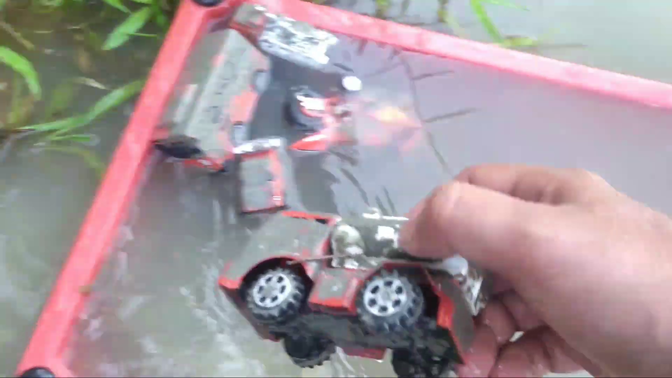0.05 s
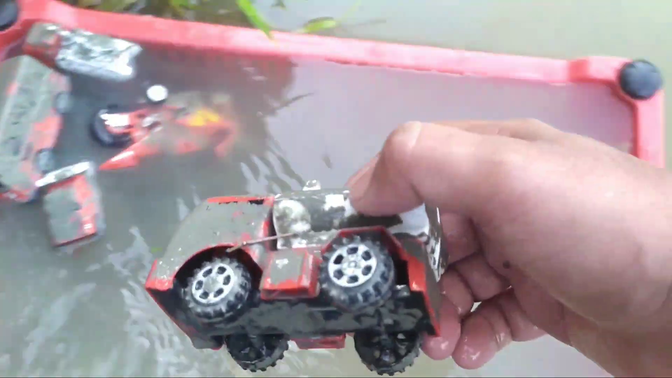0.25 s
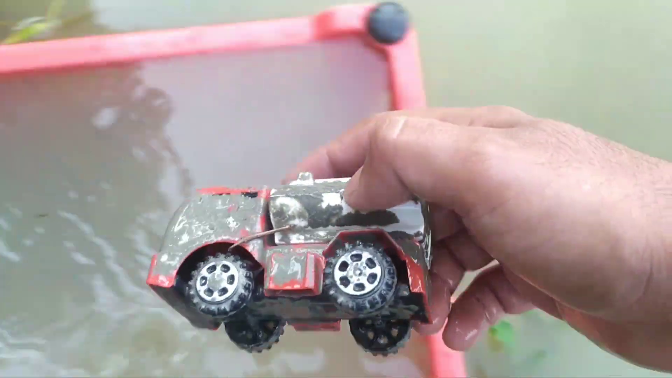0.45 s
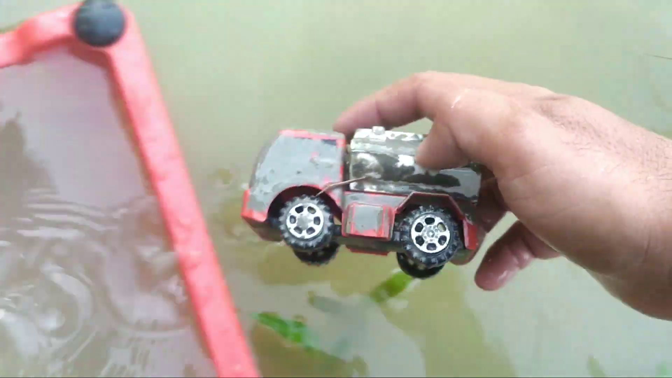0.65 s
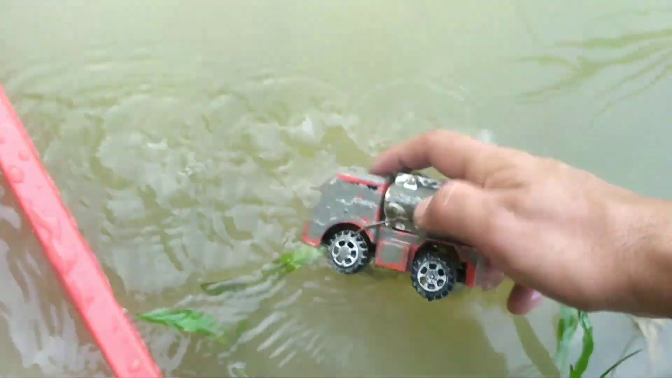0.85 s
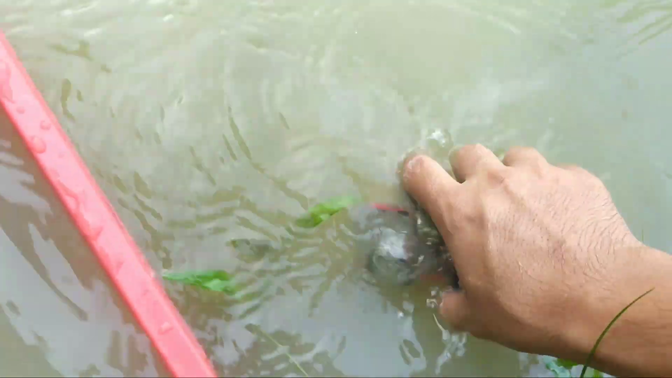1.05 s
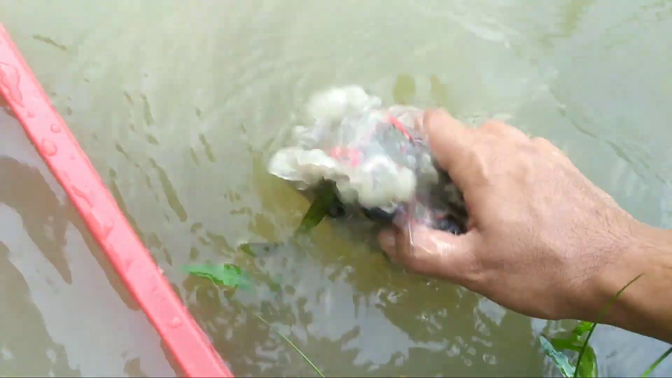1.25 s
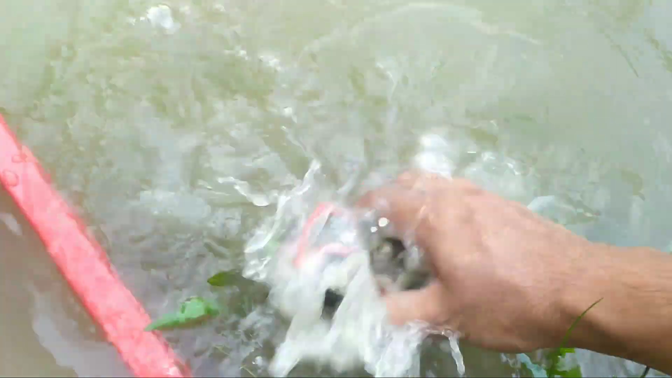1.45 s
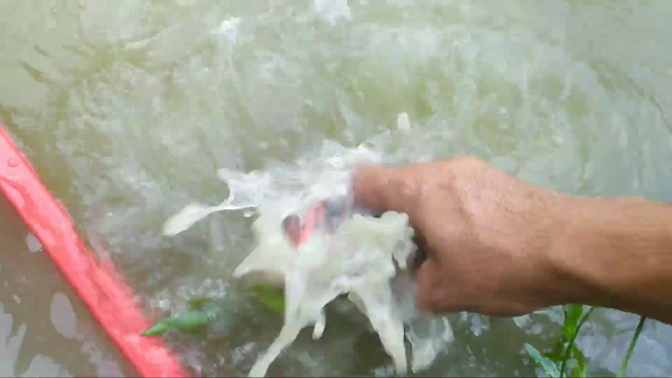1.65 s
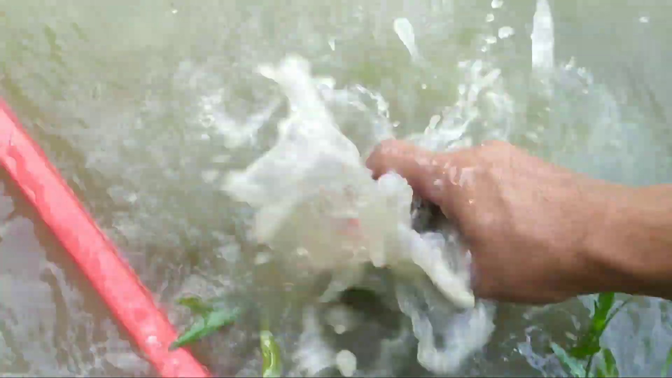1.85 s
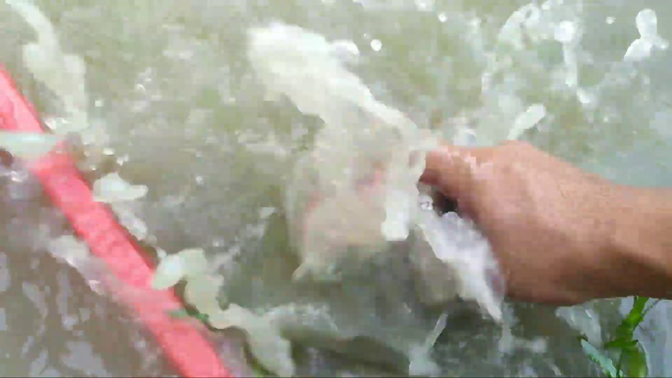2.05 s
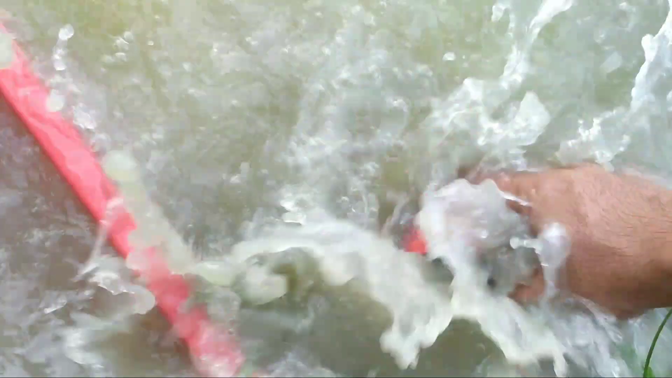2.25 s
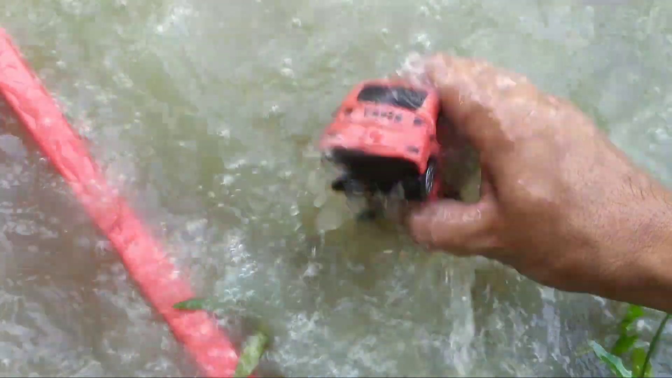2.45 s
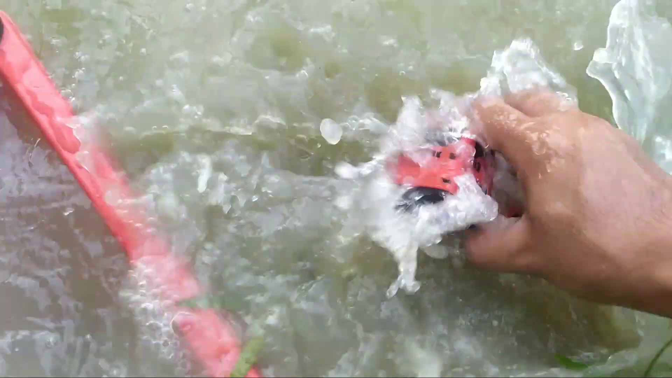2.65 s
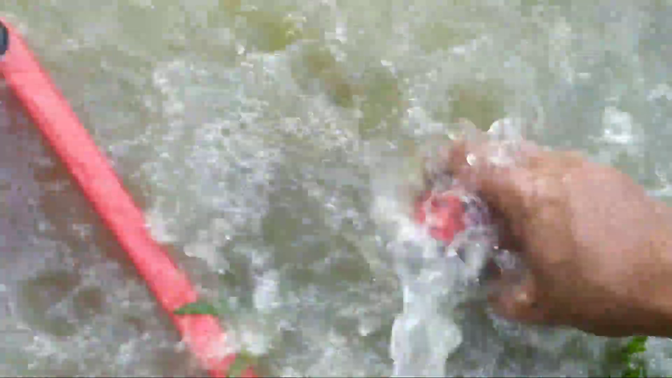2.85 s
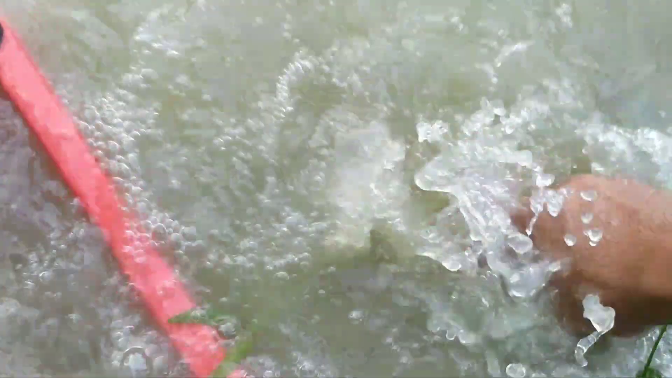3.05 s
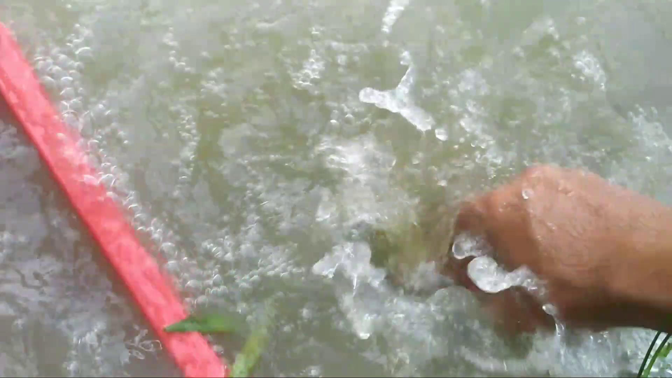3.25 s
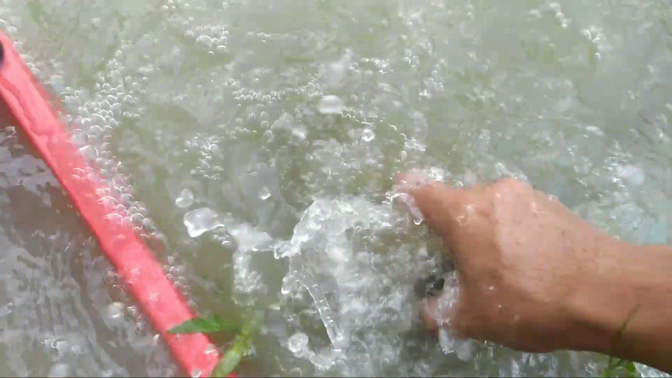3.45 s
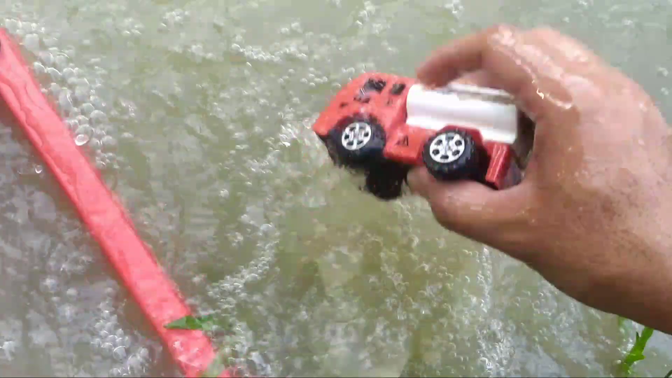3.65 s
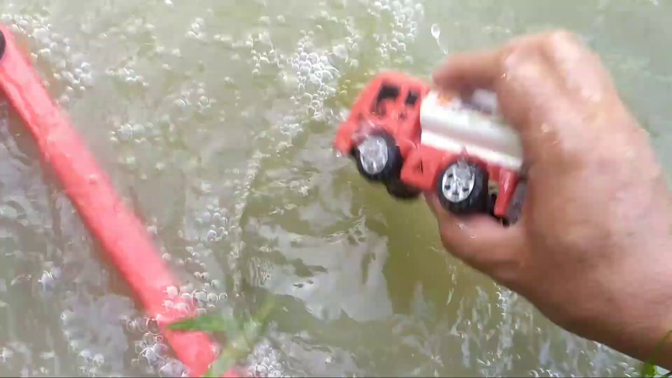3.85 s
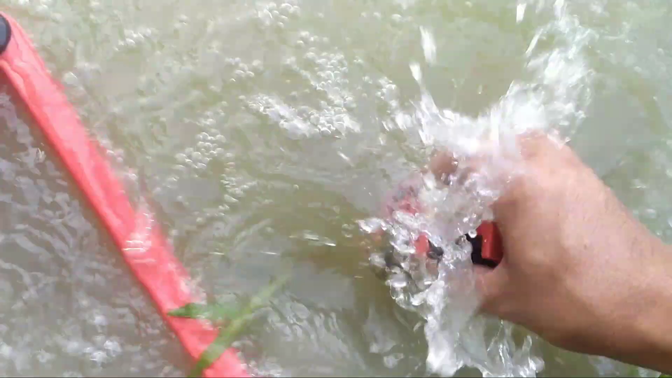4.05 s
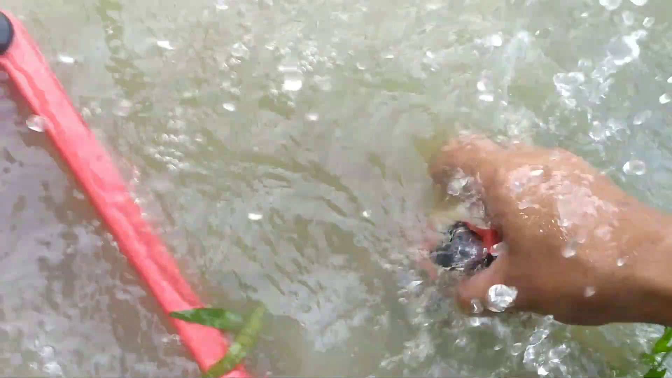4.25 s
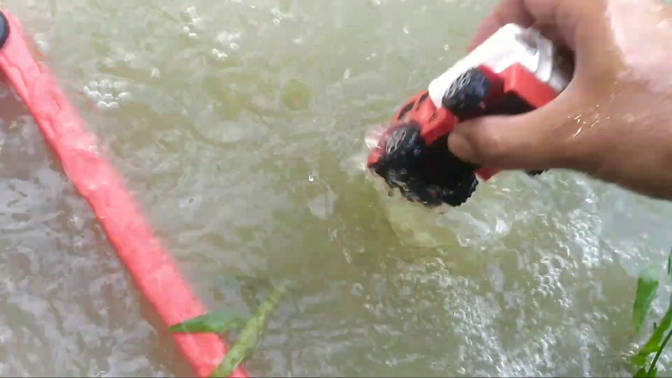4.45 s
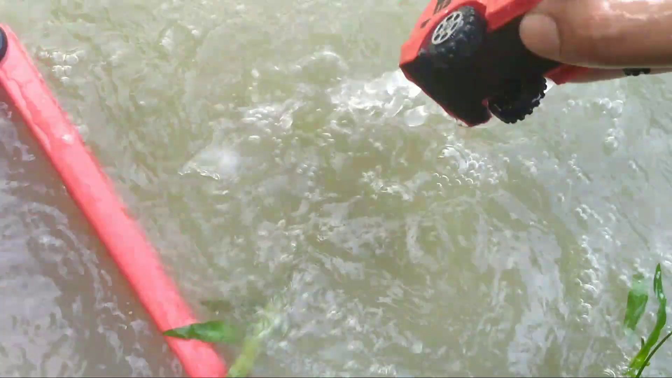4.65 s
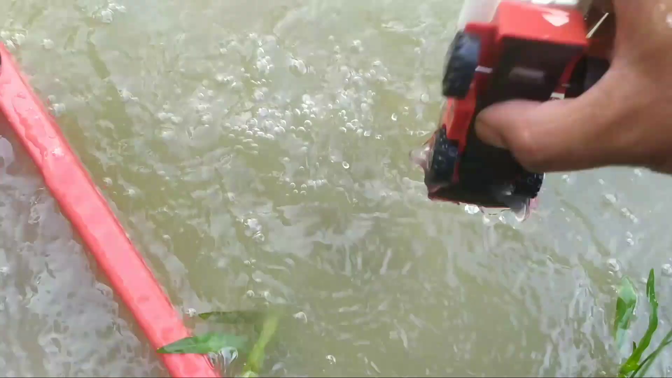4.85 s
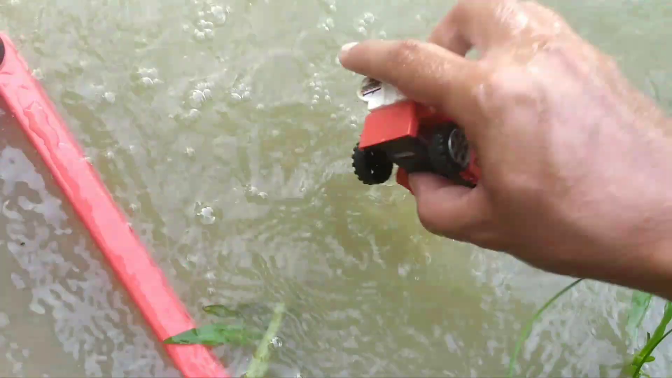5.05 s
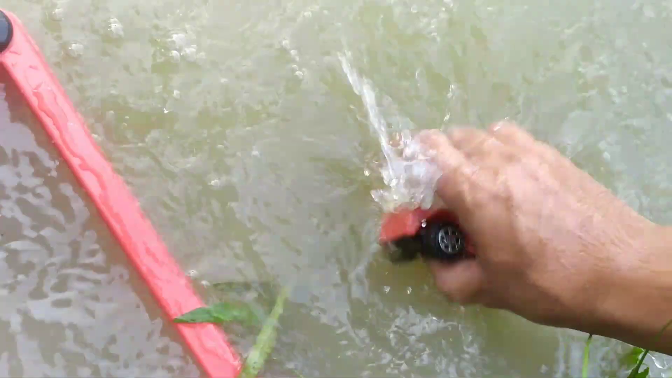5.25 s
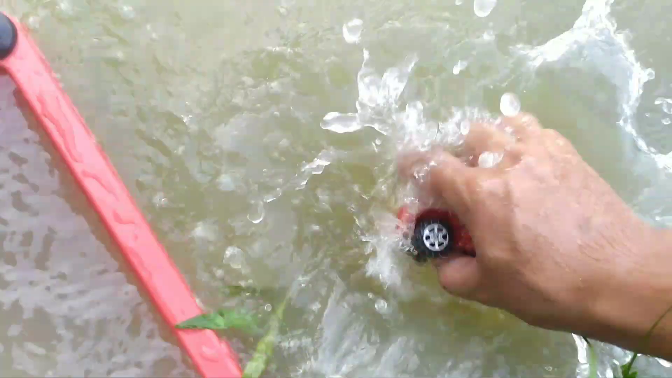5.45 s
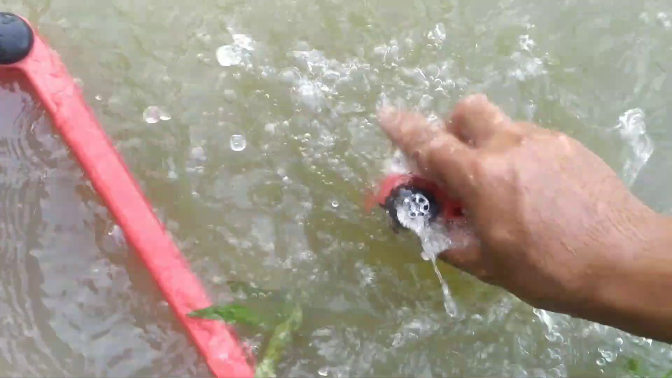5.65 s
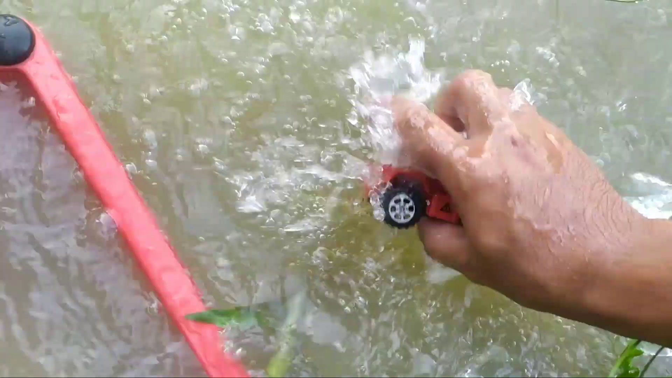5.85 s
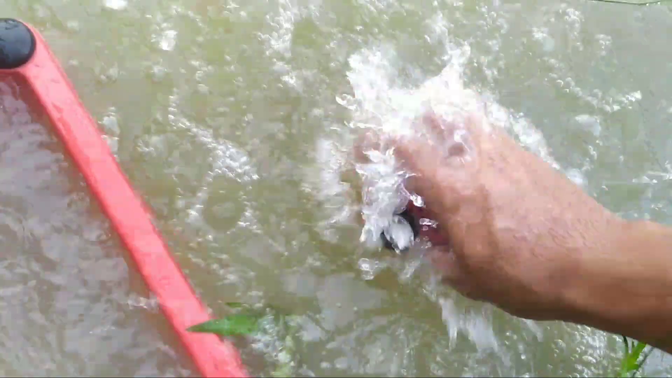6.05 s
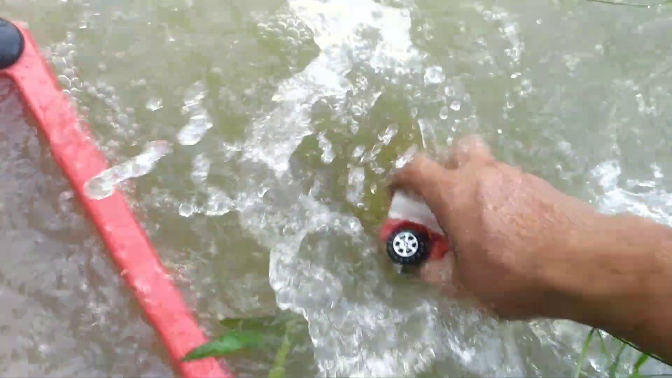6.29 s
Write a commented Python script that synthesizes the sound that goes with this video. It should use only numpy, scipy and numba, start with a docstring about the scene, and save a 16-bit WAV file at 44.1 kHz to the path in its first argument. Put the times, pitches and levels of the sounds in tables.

```python
"""Surges of bubbles and spray as a small plastic toy is shaken to and fro in a puddle, close to a phone.
Each stroke drives crowds of short rising rings with hiss; slaps are a hard knock, a cluster of short
rings and a treble crack. Single bubbles and drops plink as damped sines that stand out from the crowds.
A far motor hums unevenly as narrow noise bands, with low rumble, under a faint outdoor hiss."""
import sys
import numpy as np
from scipy import signal
from scipy.fft import rfft, irfft, next_fast_len
from scipy.io import wavfile
from scipy.ndimage import uniform_filter1d
from numba import njit

SR = 44100
rng = np.random.default_rng(int(sys.argv[2]) if len(sys.argv) > 2 else 0)


def int16_out(signal):
    """Quantize to a 16-bit WAV file."""
    q = np.round(np.clip(np.atleast_2d(signal).T, -1, 1) * 32767)
    wavfile.write(sys.argv[1], SR, q.astype(np.int16))


N = 278800

FULL_BOIL_DB = -38.5  # stirring level under which bubbles grow rarer

# How much big trapped air gurgles. Each row: time in seconds, gurgle over fizz in dB.
GULP = [(0, -4), (1.4, -6.5), (1.8, 0), (2.0, -16), (2.33, -17.5), (2.45, 3), (3.0, 0), (3.5, 4),
        (3.95, -16), (4.3, 10.5), (5.2, -26), (5.35, -2.5), (5.7, -4), (6.32, -4)]


def undb(db):
    """Gain of a level in dB."""
    return 10 ** (np.asarray(db) / 20)


def level(x, db):
    """Scale to an rms level in dB."""
    return x * undb(db) / np.sqrt(np.mean(x ** 2))


def noise():
    """White noise as long as the scene."""
    return rng.standard_normal(N)


def colour(x, points):
    """Filter by (Hz, dB) points joined on a log-frequency axis."""
    size = next_fast_len(len(x))
    hz, db = np.transpose(points)
    bins = np.arange(1, size // 2 + 2) * SR / size
    gain = undb(np.interp(np.log(bins), np.log(hz), db))
    return irfft(rfft(x, size) * gain, size)[:len(x)]


def curve(points):
    """A control of (seconds, value) points joined by straight lines, sample by sample."""
    return np.interp(np.arange(N) / SR, *np.transpose(points))


def clumps(rate, db):
    """Random gains, `rate` a second, joined by ramps in dB: water tears in lumps."""
    hold = int(SR / rate)
    steps = np.repeat(rng.standard_normal(N // hold + 1), hold)
    return undb(db * uniform_filter1d(steps, hold)[:N])


@njit
def rings(start, hz, t60, climb, size, onset):
    """Damped sines that swell over `onset` cycles while their pitch climbs (Hz a second), as bubbles do."""
    out = np.zeros(N)
    for k in range(len(start)):
        n = t60[k] * SR
        # the phasor z turns and shrinks by step; glide speeds up the turning
        z, glide = size[k] + 0j, np.exp(2j * np.pi * climb[k] / SR / SR)
        step = np.exp(2j * np.pi * hz[k] / SR - np.log(1000) / n)
        wait, swell = 1., np.exp(-hz[k] / (onset * SR))
        first = int(start[k] * SR)
        for i in range(first, min(first + int(n), N)):
            out[i] += z.imag * (1 - wait)
            z, step, wait = z * step, step * glide, wait * swell
    return out


def air():
    """The outdoor hiss: steady coloured noise."""
    # Each row: frequency in Hz, density in dB per Hz.
    air_colour = [(150, 2), (300, 4.5), (500, 1.5), (1000, -26), (3400, -9.5), (6800, -12.5), (9000, -11)]
    return level(colour(noise(), air_colour), -57.5)


def rumble():
    """Low noise that swells and sinks."""
    # Each row: time in seconds, level in dB.
    rumble_swell = [(0, -40.5), (.17, -34), (.32, -44), (2.2, -44.5), (2.9, -44), (3.9, -45), (4.2, -46.5),
                    (4.5, -39), (4.8, -44.5), (6.32, -44.5)]
    # Each row: frequency in Hz, density in dB per Hz.
    rumble_colour = [(20, -67.5), (32, -28), (45, 0), (67, 3), (95, -5), (125, -5.5), (180, -10.5),
                     (260, -24.5), (500, -68)]
    return level(colour(noise(), rumble_colour), 0) * undb(curve(rumble_swell))


def motor():
    """The far motor: noise through narrow resonances makes tones that waver."""
    # Each row: pitch in Hz, width in Hz, level over the motor curve in dB.
    tones = [(68.1, 2.7, 0), (109, 8.1, -18.5)]
    # Each row: time in seconds, level of the hum in dB.
    motor_swell = [(0, -42), (.7, -45), (1.3, -39), (1.7, -48), (2.5, -39.5), (3.8, -42), (4.05, -42.5),
                   (4.5, -45), (5.3, -47.5), (6.32, -45.5)]
    hum = np.zeros(N)
    for hz, width, db in tones:
        b, a = signal.iirpeak(hz, hz / width, SR)
        hum += level(signal.lfilter(b, a, noise()), db)
    return hum * undb(curve(motor_swell))


def burst(s, db, hz, t60, spread, count):
    """Each impact sheds a tight cluster of very short rings, scattered in pitch (octaves) and start."""
    late, detune, longer = np.moveaxis(rng.random((len(s), count, 3)), -1, 0)
    start = s[:, None] + .11 * t60 * late
    pitch = np.clip(hz[:, None] * 2 ** (spread * (detune - .5)), 100, 8600)
    size = undb(db[:, None] - 10 - 2.4 * late)
    ring = (t60 * (.78 + .5 * longer)).ravel()
    return rings(start.ravel(), pitch.ravel(), ring, 0 * ring, size.ravel(), .6)


def ticks():
    """Drops bursting on the surface, bright and dry: a sharp tap and a cluster of short rings."""
    # Each row: time in seconds, level in dB, centre in Hz.
    drops = [(.1116, -47.5, 6400), (0.201, -39.5, 6770), (.227, -35, 7000), (.292, -46, 3900),
             (0.3002, -31.5, 6130), (0.3056, -36, 6700), (.3625, -35, 7100), (0.389, -43, 7000),
             (0.441, -31.5, 6330), (0.483, -34.5, 4900), (.4946, -38.5, 6400), (0.694, -46.5, 7300),
             (0.927, -29.5, 4050), (.95, -34.5, 4700), (1.043, -42, 5270), (1.1, -39, 3350),
             (1.3166, -43, 6000), (1.6537, -26.5, 3520), (1.7544, -23, 6450), (2.138, -27, 3950),
             (3.619, -28.5, 6660), (4.337, -28, 5340), (4.3776, -32.5, 5550), (5.167, -45, 4350),
             (5.1864, -26.5, 3720), (5.244, -26.5, 7800), (6.1528, -20.5, 3420)]
    s, db, hz = np.transpose(drops)
    t60 = .025  # s, basis for the cluster's rings
    tap = rings(s, hz, .28 * t60 + 0 * s, 0 * s, undb(db + 4), .13)
    return tap + burst(s, db, hz, t60, .91, count=12)


def slaps():
    """The toy or a sheet of water slaps the surface: one hard knock, a broken body and a treble crack."""
    # Each row: time in seconds, level in dB, centre in Hz, treble over that level in dB.
    hits = [(1.485, -20, 2060, -21), (1.684, -17.5, 1380, -7), (1.87, -14.5, 2900, -23),
            (2.8, -10, 1900, -1), (3.025, -6.5, 282, -17), (3.206, -13.5, 1415, -14),
            (3.386, -12.5, 1350, -36), (3.995, -8, 640, -21), (4.093, -7.5, 1236, -35),
            (4.116, -16.5, 2210, 5), (4.509, -34.5, 1400, 4), (5.001, -31, 1320, -8),
            (5.565, -13.5, 1740, -7.5), (5.643, -13.5, 2450, 0.5), (5.822, -21, 1210, -7),
            (6.262, -11.5, 2350, -4)]
    s, db, hz, treble_db = np.transpose(hits)
    t60 = .016  # s, basis for all three parts
    knock = rings(s, hz, .4 * t60 + 0 * s, 0 * s, undb(db + 1), .25)
    body = burst(s, db - 5, hz, t60, 1, count=5)
    crack = burst(s, db + treble_db, 4500 + 0 * s, .67 * t60, 1.3, count=12)
    return knock + body + crack


def drips():
    """The clearest bubbles: the tap of the drop that trapped each, its ring, and a smaller twin that roughens it."""
    # Each row: start in seconds, size in dB, first pitch in Hz, ring t60 in ms, pitch climb in Hz per ms.
    plinks = [(0.046, -42, 2890, 25, -2), (.089, -39.5, 1920, 32, 4), (.134, -34, 3260, 16, 0),
              (.148, -52, 1860, 30, -3), (.16, -36.5, 3080, 29, 6), (.232, -48, 2850, 20, -4),
              (.26, -39, 1639, 37, 29), (.262, -45.5, 2750, 57, 0), (.307, -43, 1180, 49, -4.5),
              (.39, -37, 1116, 62, 33), (0.444, -46.5, 1115, 75, -1), (0.898, -44, 1470, 16, 5),
              (0.912, -27.5, 1330, 9.1, 15), (.972, -37, 1800, 27, 11), (.977, -28.5, 940, 25, 15),
              (1.005, -39, 645, 43, 1.5), (1.019, -41, 3150, 31, -1), (1.038, -39.5, 1110, 17, 2),
              (1.04, -44, 5100, 35, 6), (1.076, -34.5, 890, 9.4, 0), (1.11, -21, 394, 14, 30),
              (1.133, -37.5, 1570, 15, 21), (1.178, -32, 530, 55, 10.5), (1.192, -44.5, 865, 93, 26.5),
              (1.205, -57, 780, 710, -1), (1.321, -34.5, 850, 37, 13), (1.323, -38, 1264, 40, 19),
              (1.363, -32, 1140, 32, 5), (1.376, -28.5, 1895, 32, 9), (1.424, -12, 1225, 11, -11),
              (1.441, -14.5, 900, 12, 3), (1.68, -29.5, 1205, 80, 1.5), (1.837, -26.5, 560, 71, 11),
              (1.987, -26, 2010, 16, 44), (2.067, -18.5, 830, 18, -6), (2.161, -27, 2060, 28, 22),
              (2.229, -20, 2000, 11.4, 0), (2.301, -24.5, 2190, 19, 25), (2.336, -19, 1660, 14.5, 18),
              (2.388, -22, 334, 31, 1), (2.409, -31, 425, 100, 2.5), (2.41, -28.5, 2160, 38, 28),
              (2.59, -22, 600, 30, -1), (2.608, -19.5, 334, 49, 3), (2.68, -21, 794, 29, 3),
              (2.695, -22, 1690, 20, 16), (2.755, -20.5, 330, 58, 1.5), (2.771, -18, 727, 30, -1),
              (2.855, -18, 336, 30, -1.5), (2.885, -17, 327, 30, 0), (2.949, -20.5, 404, 25, 2),
              (3.192, -19, 730, 20, 7), (3.203, -14.5, 333, 37, 0.5), (3.205, -18.5, 1424, 57, 26),
              (3.368, -12, 405, 28, 4.5), (3.388, -16.5, 1155, 41, 29.5), (3.48, -26, 500, 27, -2),
              (3.527, -25, 690, 25, 3), (3.573, -30, 1875, 30, 10), (3.666, -37, 950, 24, 12),
              (3.683, -33.5, 1380, 32, 16), (3.721, -34, 620, 19, 0), (3.811, -38, 2160, 12, -6),
              (3.817, -43, 736, 54, 4), (3.836, -35.5, 1380, 34, 11), (3.838, -41, 676, 67, 2.5),
              (3.934, -39.5, 2210, 16, 34), (3.969, -19, 910, 14, 24), (3.969, -25.5, 1610, 22, 14),
              (4.123, -24.5, 527, 67, 8.5), (4.2, -24.5, 2240, 23, 10), (4.28, -32.5, 1755, 51, 17),
              (4.284, -25.5, 487, 54, 8.5), (4.404, -27, 3430, 13, -3), (4.418, -36, 1710, 29, 50),
              (4.436, -25, 1700, 18, 7), (4.453, -31, 447, 26, -2), (4.461, -32, 1810, 22, 22),
              (4.53, -51, 1410, 30, 11), (4.571, -38.5, 1270, 27, 31), (4.615, -44, 980, 44, 18),
              (4.697, -37, 970, 24, 2), (4.697, -39, 1525, 64, 6), (4.846, -42.5, 944, 55, 0),
              (4.887, -40, 1220, 37, 1), (4.956, -36, 3170, 7.6, 2), (4.983, -42, 2140, 18, 27),
              (5.003, -57, 820, 88, -3), (5.063, -33.5, 1123, 45, 48), (5.079, -38.5, 960, 66, 26),
              (5.118, -36, 1700, 17, 5), (5.135, -29.5, 1063, 40, -5.5), (5.188, -32.5, 1240, 53, 14),
              (5.258, -23.5, 794, 75, 9.5), (5.298, -25.5, 1787, 17, 26), (5.341, -22, 850, 33, -1),
              (5.442, -17.5, 695, 23, 21), (5.476, -21.5, 1250, 20, 0), (5.51, -18.5, 514, 32, 15),
              (5.663, -23, 2230, 24, 55), (5.793, -21, 1870, 14, 20), (5.908, -22.5, 416, 49, 9),
              (5.987, -18.5, 436, 40, 1), (5.987, -23, 727, 34, 4), (6.088, -22.5, 1930, 37, 1.5),
              (6.235, -22.5, 630, 54, 0)]
    s, db, hz, t60_ms, climb = np.transpose(plinks)
    t60, climb_hz = t60_ms / 1000, 1000 * climb
    late, detune = rng.random((2, len(s)))
    tap = rings(s, 2.16 * hz, .0037 + 0 * s, 0 * s, undb(db - 5), .09)
    ring = rings(s, hz, t60, climb_hz, undb(db), 1.2)
    twin_hz, twin_t60 = hz * (.85 + .4 * detune), np.minimum(.6 * t60, .03)
    twin = rings(s + .006 * late, twin_hz, twin_t60, climb_hz, undb(db - 7), 1.2)
    return tap + ring + twin


def surge_power():
    """Each stroke swells and sinks as a nearly even bell of gurgle, fizz and spray power."""
    # Each row: crest in seconds, fizz in dB, length in ms, spray over fizz in dB.
    surges = [(0.932, -55.5, 85, 9.5), (1.385, -39, 63, 3), (1.448, -30.5, 53, -2.5),
              (1.491, -31.5, 32.4, 9), (1.596, -33.5, 37, -17), (1.688, -31.5, 37, 3),
              (1.808, -40.5, 38, 0), (1.883, -29.5, 36, 2), (1.979, -40.5, 40, 10), (2.075, -30.5, 45, 1.5),
              (2.168, -42.5, 23, 8.5), (2.267, -38.5, 41, 5.5), (2.345, -42.5, 77, 8.5),
              (2.41, -42, 36, 9.5), (2.475, -41.5, 37, 1), (2.613, -31.5, 80, 4), (2.693, -32.5, 110, -2.5),
              (2.801, -28, 35.5, 3.5), (2.886, -34, 63, 0.5), (2.963, -32, 48, -0.5), (3.03, -31.5, 59, -8),
              (3.15, -33.5, 85, -5), (3.222, -30, 55, 1), (3.307, -30.5, 32, -14), (3.388, -29, 53, -1.5),
              (3.489, -37.5, 59, -6), (3.572, -42.5, 91, -0.5), (4.007, -28.5, 52, 3),
              (4.097, -35, 140, 1.5), (4.199, -42, 79, 7.5), (4.259, -39, 47, -13), (4.372, -41.5, 19, 7),
              (4.441, -47.5, 140, -2), (4.784, -52, 45, 3), (5.246, -33, 33, 5.5), (5.341, -33.5, 36, 3),
              (5.473, -30.5, 62, 2), (5.558, -26, 91, -4), (5.641, -28.5, 57, 0.5), (5.728, -26.5, 53, -3),
              (5.836, -27.5, 43, -3.5), (5.929, -29.5, 90, -3), (6.012, -31.5, 48, 5),
              (6.086, -27, 43, -6.5), (6.174, -31.5, 47, 3), (6.262, -30.5, 47, -1), (6.32, -30, 55, -7)]
    rise_share = .51  # part of a surge's length before its crest
    t, power = np.arange(N) / SR, np.zeros((3, N))
    for s, db, length_ms, spray_db in surges:
        a, b = int((s - .12) * SR), int((s + .15) * SR)
        late = 1000 * (t[a:b] - s) / length_ms
        side = np.where(late < 0, rise_share, 1 - rise_share)
        bell = np.exp(-3 * (late / side) ** 2)
        gurgle_db = np.interp(s, *np.transpose(GULP))
        power[:, a:b] += bell * undb(2 * (db + np.array([[gurgle_db], [0], [spray_db]])))
    return power


def wash_power():
    """Stirred water running on between strokes, as gurgle, fizz and spray power."""
    # Each row: time in seconds, fizz in dB.
    wash = [(0, -73), (.3, -59.5), (.8, -83.5), (1.3, -74), (1.4, -44), (1.55, -42.5), (2.22, -36.5),
            (2.5, -42.5), (2.78, -36), (3.06, -42), (3.4, -38), (3.64, -51.5), (3.94, -60), (4.1, -36.5),
            (4.54, -56), (5.09, -62.5), (5.25, -44), (5.65, -41), (6.32, -38.5)]
    fizz_db = curve(wash)
    gurgle_db = fizz_db + .4 * curve(GULP)  # the wash follows the gurgle curve in part
    spray_db = fizz_db - 2.5 + .3 * (FULL_BOIL_DB - fizz_db)  # calm water gains spray
    return undb(2 * np.array([gurgle_db, fizz_db, spray_db]))


def crowd(kind, power):
    """Random bubbles, a few much larger than the rest; weak stirring makes them smaller and rarer."""
    low_hz, high_hz, rate, cycles, rise, spread_db = kind
    when, pitch, damping, big, climb, luck = rng.random((6, int(rate * N / SR)))
    hz = low_hz * (high_hz / low_hz) ** pitch ** .75
    t60 = cycles / hz * (.3 + 2.2 * damping ** 2)
    size = undb(-spread_db * np.log(1 - .99 * big)) * np.sign(climb - .5)
    # bring the full crowd to unit power before the stirring drives it
    size = size / np.sqrt(rate * np.mean(size ** 2 * t60) / (4 * np.log(1000)))
    born = when * (N - 1)
    stir = power[born.astype(int)]
    share = np.clip(np.sqrt(stir) / undb(FULL_BOIL_DB), .3, 1)  # part of the bubbles that are born
    size = size * np.sqrt(stir / share) * (luck < share)
    return rings(born / SR, hz, t60, 2 * rise * climb * hz / t60, size, .8)


def churn():
    """Stirring drives bubble crowds; droplets patter, air sloshes low and the finest spray merges into hiss."""
    # Each crowd: lowest Hz, highest Hz, births a second at full boil, cycles of ring,
    # mean pitch rise as a share, size spread in dB.
    gurgle_kind = (240, 880, 800, 6, .4, 2.6)
    fizz_kind = (800, 3100, 1200, 12, .4, 4.3)
    spray_kind = (2600, 8200, 3500, 12, .15, 4.5)
    patter_kind = (1500, 7000, 300, 4, 0, 3.5)
    gurgle, fizz, spray = surge_power() + wash_power()
    bubbles = crowd(gurgle_kind, gurgle) + crowd(fizz_kind, fizz) + crowd(spray_kind, spray)
    patter = undb(-5.5) * crowd(patter_kind, spray)
    foam = clumps(150, 6) * colour(noise(), [(400, -30), (900, 0), (2500, 0), (5000, -14)])
    mist = clumps(200, 6) * colour(noise(), [(1500, -25), (3000, 0), (8000, -1)])
    hiss = level(foam, -8.5) * np.sqrt(fizz) + level(mist, -6) * np.sqrt(spray)
    # where big pockets of air rule, the whole puddle sloshes low
    low = level(colour(noise(), [(100, -29.5), (230, 3), (600, -22)]), -12)
    slosh = low * gurgle / np.sqrt(gurgle + fizz)
    return bubbles + patter + hiss + slosh


def scene():
    """Motor and air far off, water close by."""
    distance = air() + rumble() + motor()
    water = ticks() + slaps() + drips() + churn()
    return (distance + water)[None]


def record(dry):
    """The phone's microphone colour, then a steep cut of the top."""
    # Each row: frequency in Hz, gain in dB.
    mic_colour = [(25, -11), (45, -6), (2300, 3), (3000, -2.5), (5500, -1), (7400, 3), (8000, -6),
                  (8600, -34), (9000, -50.5)]
    top_cut = signal.ellip(8, .2, 70, 9100, fs=SR, output="sos")  # cut above 9100 Hz
    return signal.sosfilt(top_cut, colour(dry[0], mic_colour))[None]


dry = scene()
out = record(dry)
int16_out(out)
```